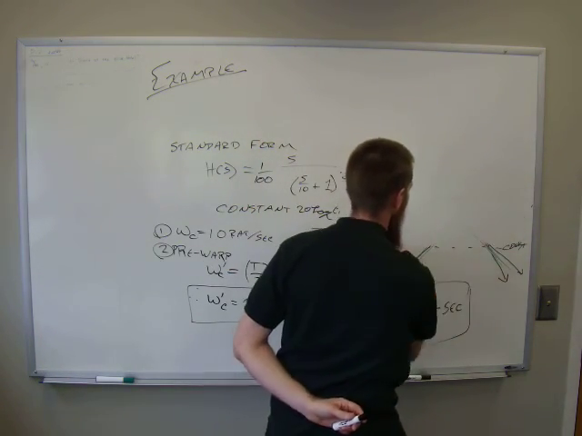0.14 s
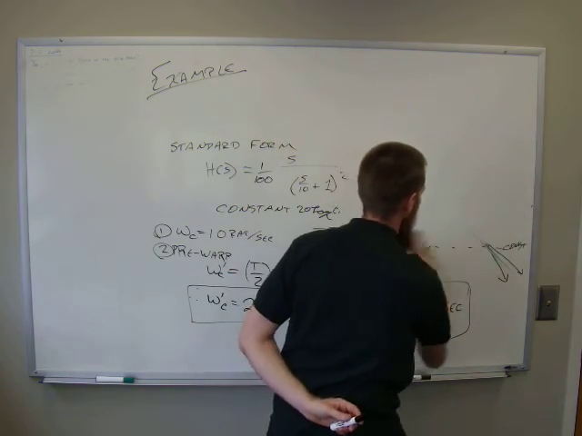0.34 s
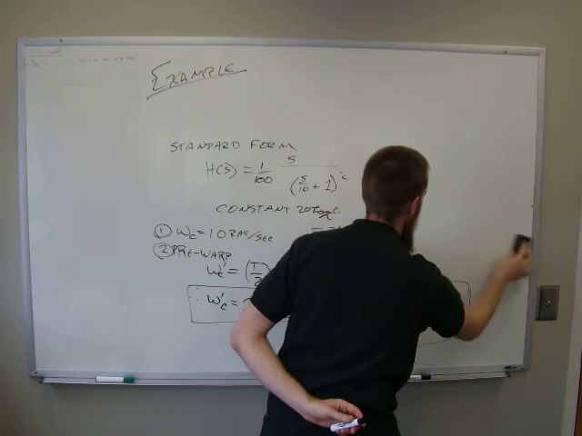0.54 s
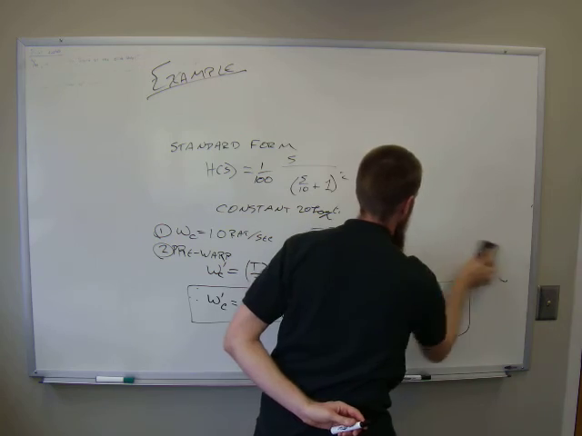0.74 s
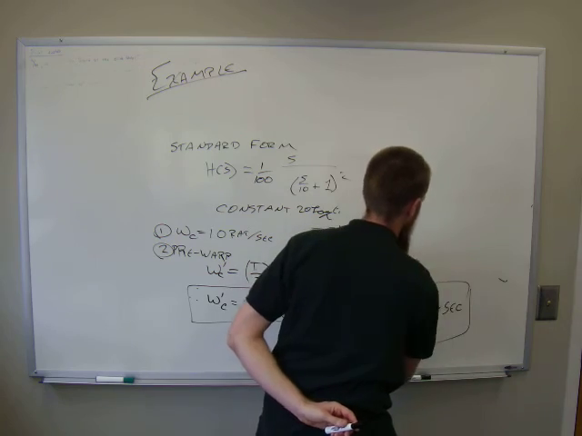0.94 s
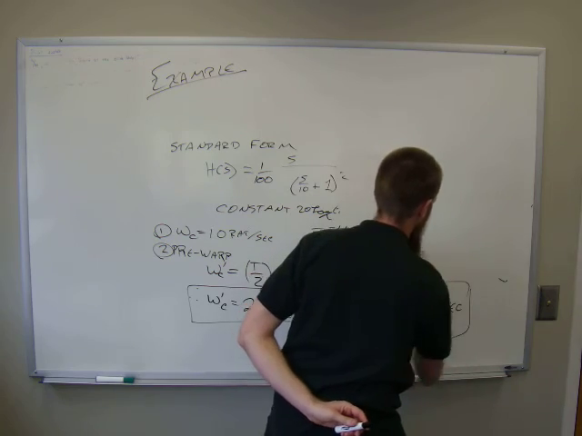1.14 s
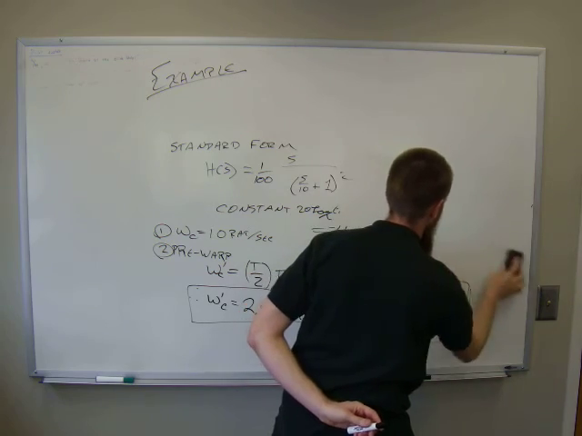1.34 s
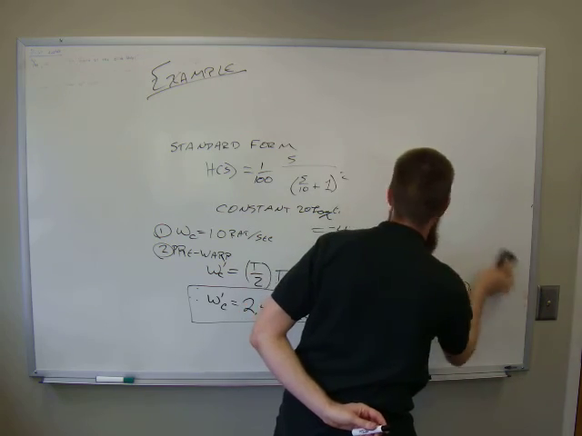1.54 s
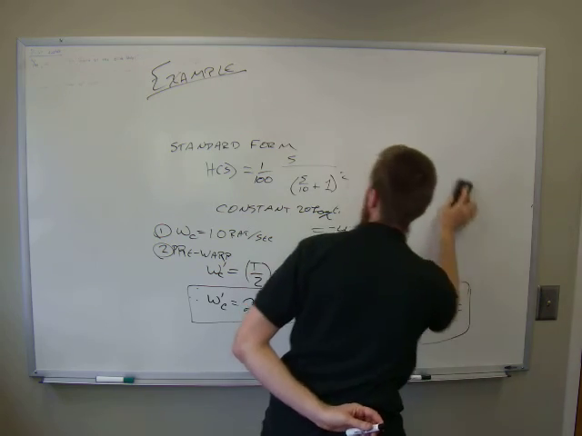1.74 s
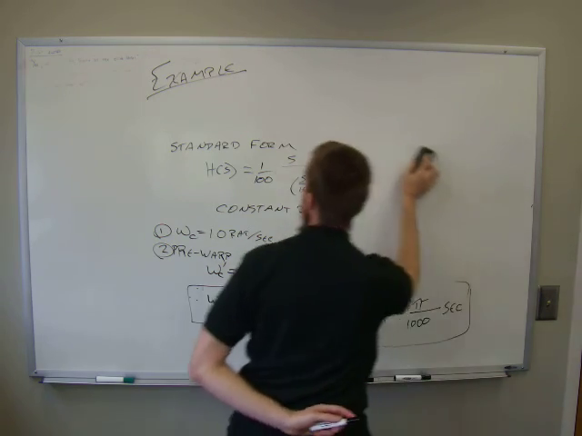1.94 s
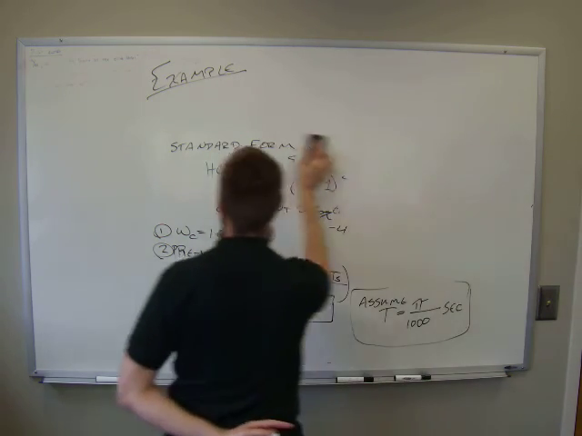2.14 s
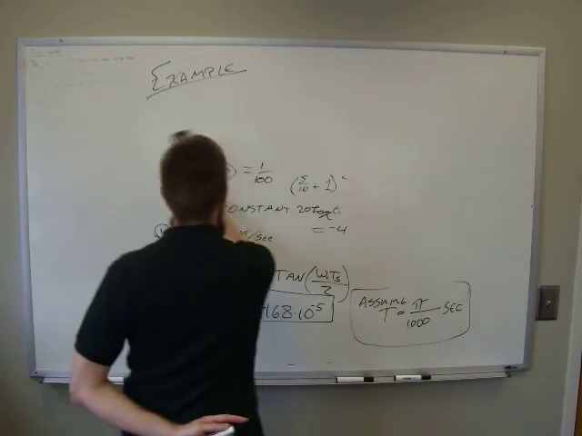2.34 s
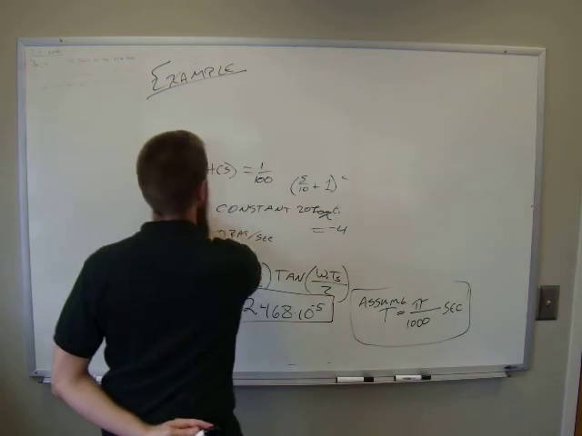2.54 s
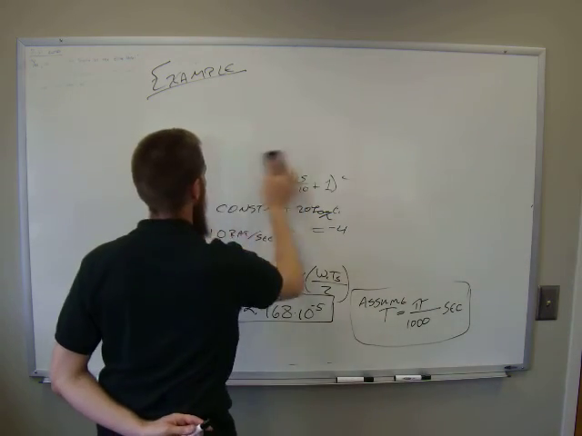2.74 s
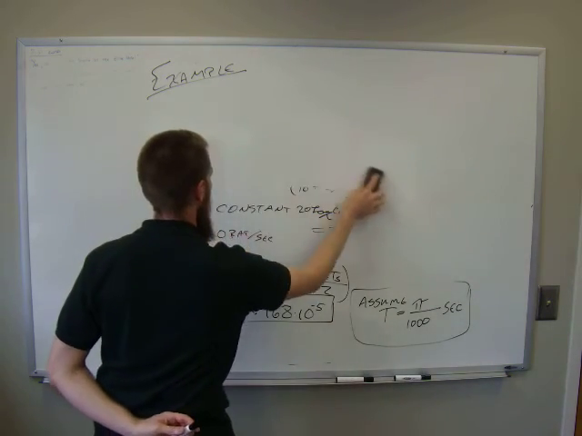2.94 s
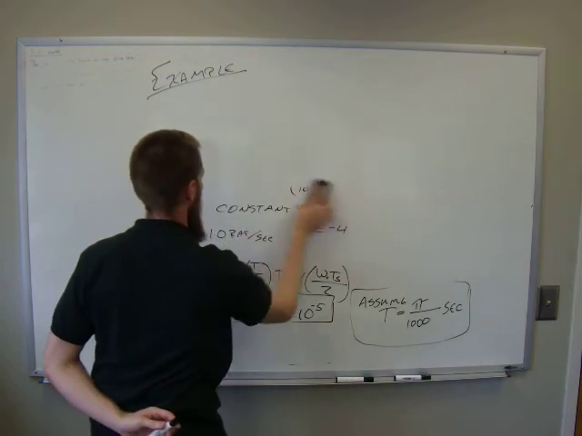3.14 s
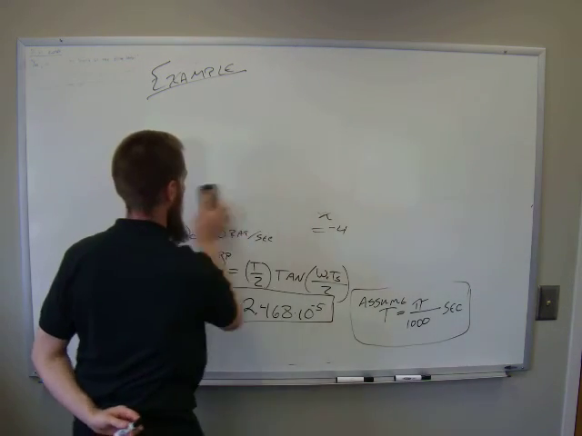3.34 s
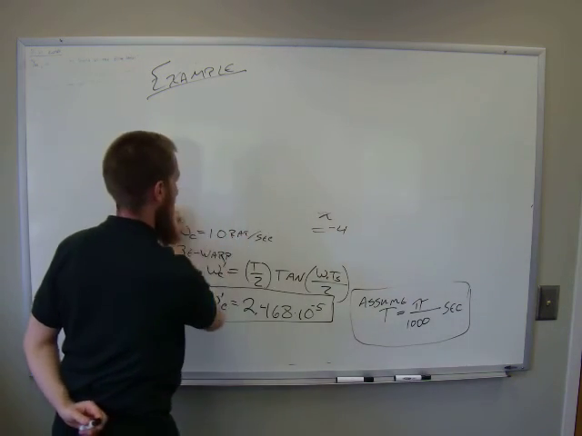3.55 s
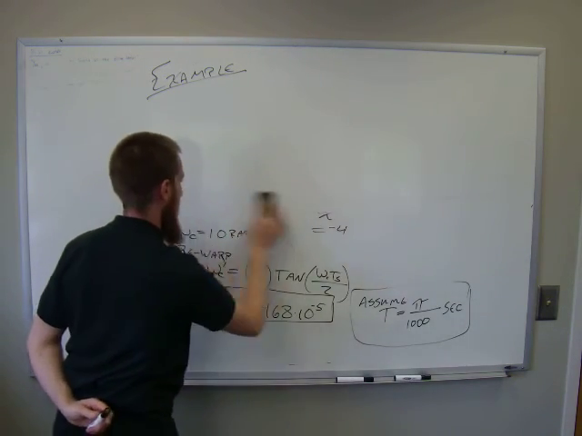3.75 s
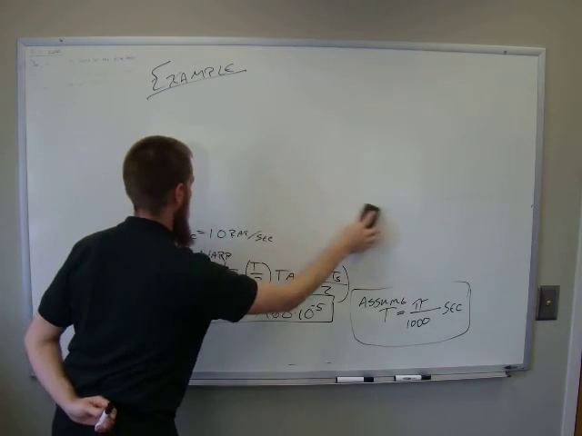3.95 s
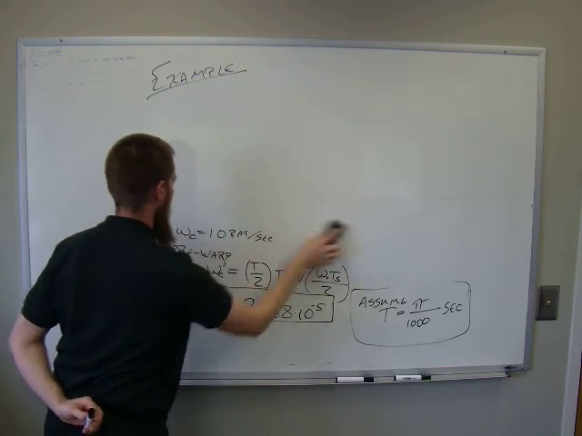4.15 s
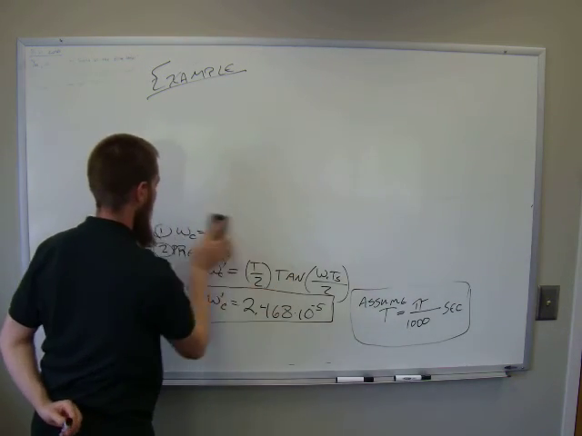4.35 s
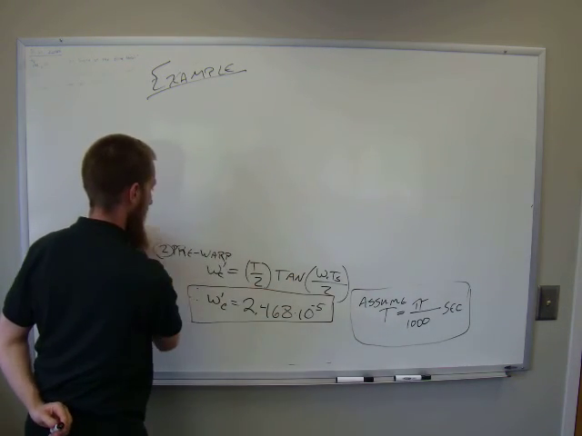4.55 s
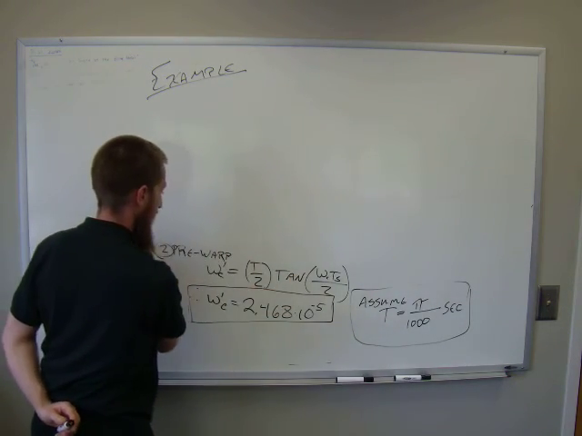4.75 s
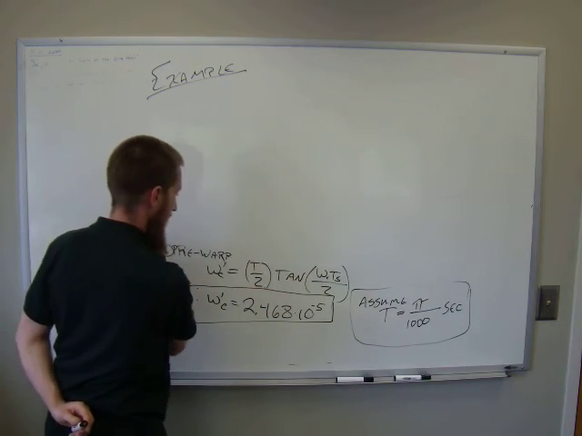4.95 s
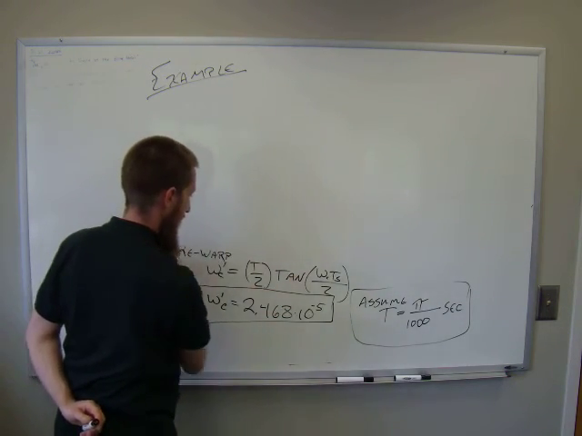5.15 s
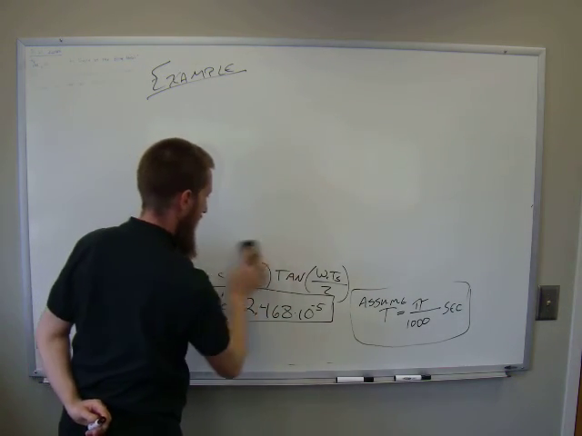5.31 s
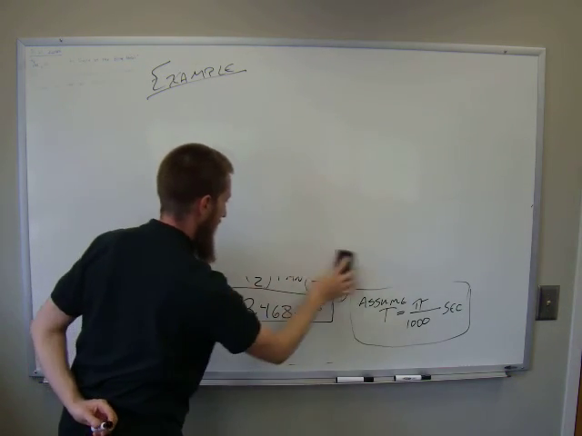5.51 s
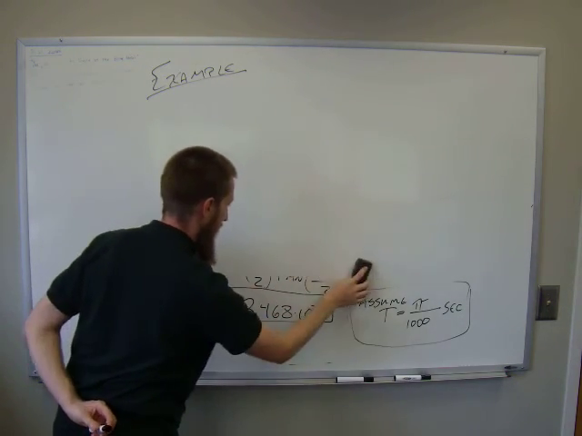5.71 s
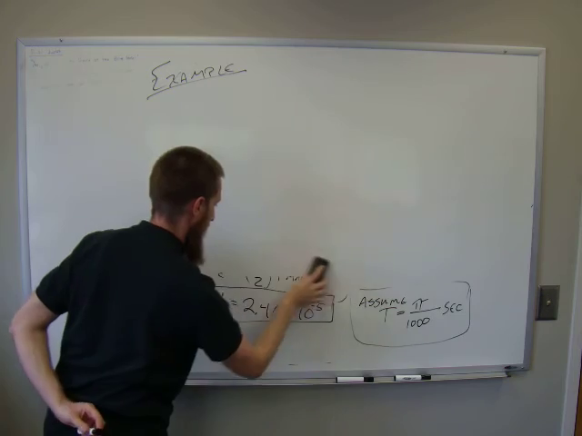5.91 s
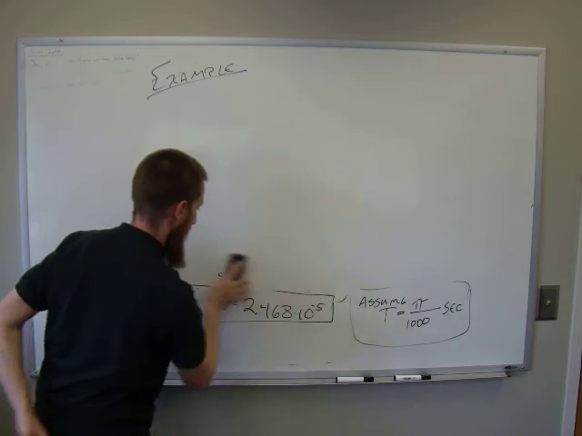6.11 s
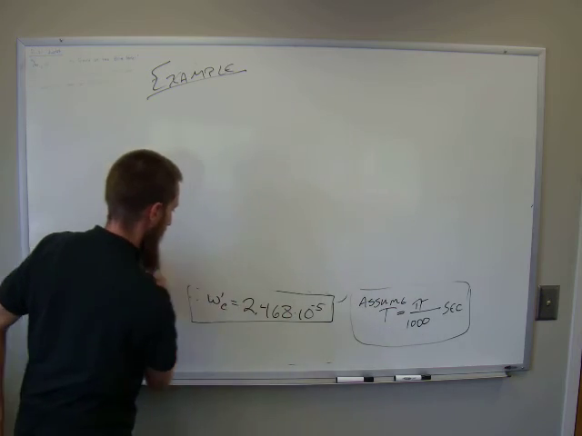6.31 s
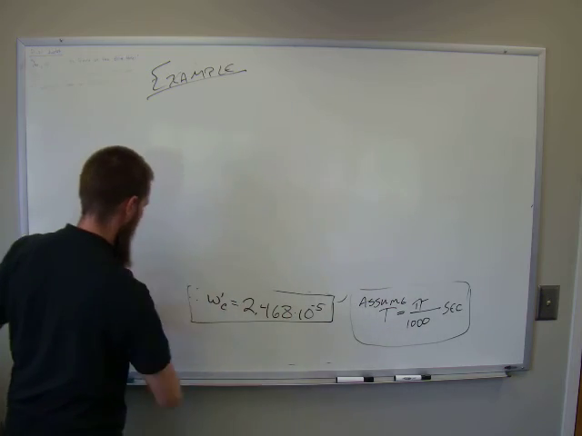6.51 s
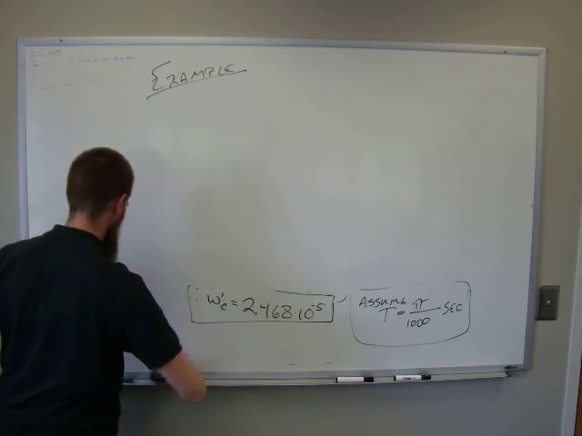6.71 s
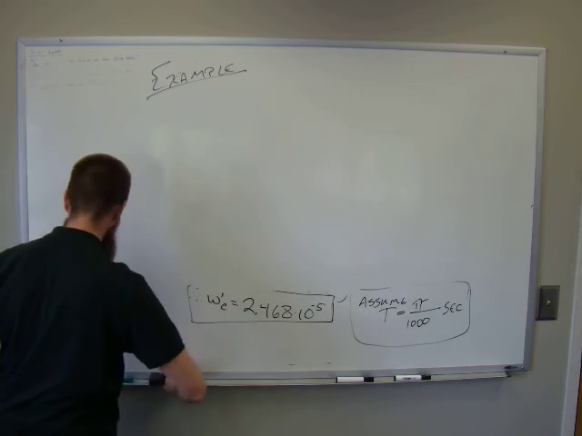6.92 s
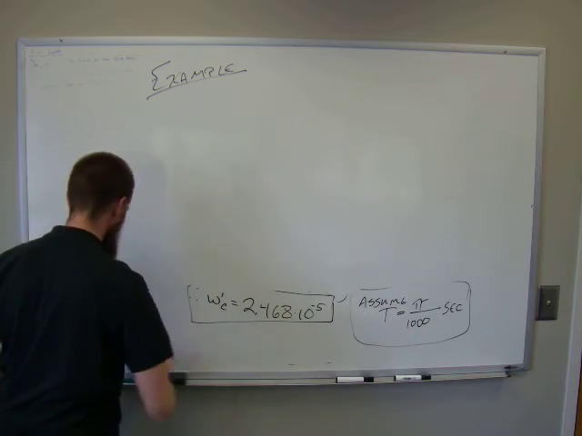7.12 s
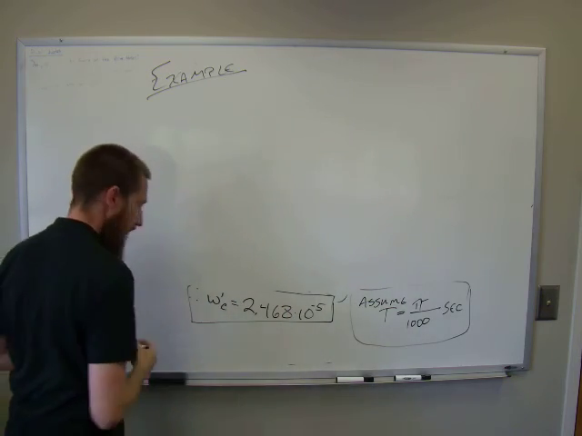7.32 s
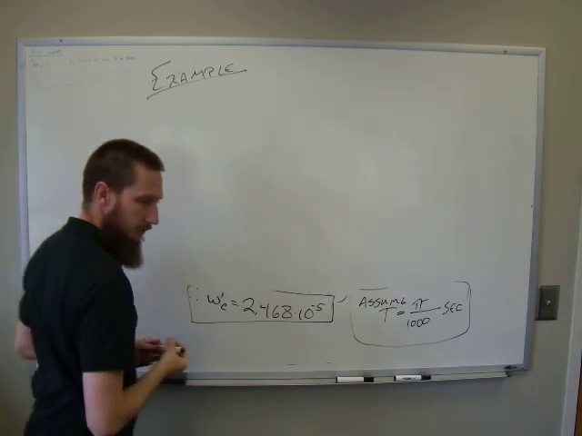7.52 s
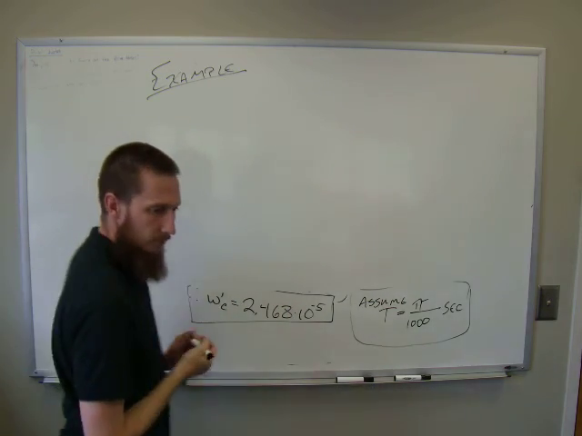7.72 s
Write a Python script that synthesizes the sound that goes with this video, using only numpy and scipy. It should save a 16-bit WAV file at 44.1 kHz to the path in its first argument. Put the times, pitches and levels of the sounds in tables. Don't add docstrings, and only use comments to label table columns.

```python
import sys
import numpy as np
from scipy import signal
from scipy.fft import rfft, irfft
from scipy.io import wavfile
from scipy.ndimage import uniform_filter1d

SR = 44100
rng = np.random.default_rng(int(sys.argv[2]) if len(sys.argv) > 2 else 0)


def attenuation_scalar(level_db):
    decades = np.asarray(level_db, float) / 20
    return 10 ** decades


def inscribe(sig):
    pcm = np.round(np.clip(np.atleast_2d(sig).T, -1, 1) * 32767)
    wavfile.write(sys.argv[1], SR, pcm.astype(np.int16))


N = 347067
FULL_SPEED_DB = -39


def level(x, db):
    return x * attenuation_scalar(db) / np.sqrt(np.mean(x ** 2))


def colour(x, points):
    hz, db = np.transpose(points)
    grid_hz = np.maximum(np.fft.rfftfreq(8192, 1 / SR), 1)
    log_gain = np.interp(np.log(grid_hz), np.log(hz), db) * np.log(10) / 20
    cepstrum = irfft(log_gain)
    cepstrum[1:4096] *= 2
    cepstrum[4097:] = 0
    impulse = irfft(np.exp(rfft(cepstrum)))
    return signal.fftconvolve(x, impulse)[:len(x)]


def walk(rate_hz):
    hold = int(SR / rate_hz)
    steps = np.repeat(rng.standard_normal(N // hold + 1), hold)
    return 1.3 * uniform_filter1d(uniform_filter1d(steps, hold), hold)[:N]


def eraser():
    # start/s, speed-up/s, slow-down/s, top-speed level/dB, pointedness (.4 flat, 2.5 peaked)
    strokes = [(-.052, 0.083, .14, -38, 0.55), (.11, 0.24, 0.28, -37, 2.34),
               (.466, 0.092, 0.075, -39.5, 1.4), (.592, .18, .19, -39.5, 0.34),
               (.955, 0.18, 0.33, -38.5, 0.77), (1.424, 0.13, 0.3, -41.5, 0.86),
               (1.699, 0.33, 0.15, -41.5, 0.61), (1.801, 0.47, 0.49, -36.6, 3.4),
               (2.399, 0.29, 0.32, -38.5, 0.88), (2.928, 0.31, 0.34, -39.5, 0.84),
               (3.495, 0.16, 0.31, -39.5, 0.41), (3.935, 0.38, 0.35, -40.5, 0.75),
               (4.5, .1, .075, -51, 0.51), (4.714, .51, 0.29, -41.5, 2.9), (5.24, 0.2, .15, -42.5, .55),
               (5.583, 0.62, 0.16, -40.8, 1.03)]
    # start/s, swell/s, fade/s, level/dB,
    # pointedness
    rustles = [
        (4.78, .03, 0.18, -56.5, .6),
        (6.36, .2, .06, -60, 0.48),
        (6.619, 0.088, .05, -55, .8),
        (6.87, 0.062, 0.076, -50, 0.84),
        (7.09, 0.057, 0.5, -55.5, 1.1),
        (7.425, 0.044, .04, -45.5, 1.3),
        (7.47, .06, 0.14, -57, .8),
        (7.59, 0.27, .15, -52.5, .4),
    ]
    # t/s, level/dB
    lean = [(0, -60.5), (.9, -60), (1.55, -55.5), (1.95, -55.5), (2.1, -50), (2.33, -44.5), (2.6, -50.5),
            (3, -55.5), (3.38, -57.5), (3.5, -50.5), (3.65, -54), (4.4, -55.5), (5.2, -56), (6.2, -58.5),
            (6.9, -53), (7.1, -53.5), (7.4, -56), (7.87, -54.5)]
    # f/Hz, gain/dB
    felt_tone = [(800, -44.5), (2000, -9), (3200, -1), (6000, 2), (8000, 2), (12000, -38)]
    # f/Hz, gain/dB
    fibre_tone = [(5000, -27), (7500, 2), (10500, 2), (13000, 1.5), (16000, -5.5)]
    # f/Hz, gain/dB
    board_tone = [(300, -37), (800, -11), (1250, 1), (1600, -2.5), (2300, -3), (3200, -7), (5000, -29.5)]
    hand, cloth = speed(strokes), speed(rustles)
    v = np.hypot(hand, cloth)
    press_db = np.interp(np.arange(N) / SR, *np.transpose(lean))
    grip_db = 0.15 * walk(18) + 0.75 * walk(60)

    felt = level(colour(slips(scatter_db=1.0), felt_tone), -0.45) * attenuation_scalar(0.21 * walk(25))
    fibres = level(colour(slips(scatter_db=0.0), fibre_tone), 12.4) * attenuation_scalar(-11 + 0.21 * walk(25.1))
    board = level(colour(slips(scatter_db=3.5), board_tone), 1.16) * attenuation_scalar(press_db + 1.6 * walk(18))

    dull = signal.lfilter(*signal.butter(2, 3280, fs=SR), felt)
    dull_speed = np.hypot(hand ** 0.52, cloth * attenuation_scalar(-2.5))
    surface = dull * dull_speed + (felt - dull) * v + fibres * v ** 1.57
    rub = surface * attenuation_scalar(FULL_SPEED_DB) + board * v ** 0.28
    return rub * attenuation_scalar(grip_db)


def speed(table):
    t, power = np.arange(N) / SR, np.full(N, 1e-9)
    for start_s, rise_s, fall_s, db, pointed in table:
        end_s = start_s + rise_s + fall_s
        ramp = np.clip(np.minimum((t - start_s) / rise_s, (end_s - t) / fall_s), 0, 1)
        power += (attenuation_scalar(db - FULL_SPEED_DB) * np.sin(np.pi / 2 * ramp) ** pointed) ** 2
    return np.sqrt(power)


def slips(scatter_db):
    jerk = np.minimum(rng.exponential(size=N), 5)
    return level(rng.standard_normal(N) * attenuation_scalar(scatter_db * jerk), 0)


def blows():
    # t/s, level/dB, centre f/Hz, spread/octaves, ring t60/s
    knocks = [(.3135, -32, 650, 0.34, 0.3), (.312, -35, 2500, .3, .05), (1.11, -39, 790, 0.56, 0.1),
              (1.415, -45, 1400, 0.52, .06), (1.585, -41, 1800, 1.1, 0.076), (2.079, -28.5, 3000, 1.6, .06),
              (2.159, -22.5, 4000, .88, 0.029), (2.294, -42.5, 1400, 0.96, .1),
              (4.28, -45, 1500, 1.34, .04), (4.79, -48, 3500, 1.3, .068), (5.639, -41, 2900, 0.57, 0.054),
              (5.638, -40.5, 1600, 0.51, 0.11), (7.803, -42, 3500, 1.2, 0.11)]
    # t/s, level/dB, centre f/Hz, spread/octaves, ring t60/s
    scuffs = [
        (.521, -21, 9400, 0.76, 0.14),
        (2.146, -26.5, 4000, .8, .1),
        (2.585, -31, 4660, 0.57, 0.21),
        (3.145, -31, 2500, 1.6, 0.16),
        (6.832, -25, 8400, 1, 0.1),
        (6.842, -23, 7750, .12, 0.079),
        (6.92, -57, 3000, 1.66, .3),
        (7.447, -34, 8500, 0.61, 0.21),
        (7.81, -42, 1450, .35, 0.18),
    ]
    # t/s, level/dB, centre f/Hz, spread/octaves, ring t60/s
    tray = [
        (6.703, -18, 5000, 1.6, 0.037),
        (6.706, -16.5, 4030, 0.49, 0.032),
        (6.712, -24.5, 3680, 1.8, 0.17),
        (6.708, -35.5, 460, 0.45, 0.47),
        (6.724, -22, 2470, 0.65, 0.098),
        (6.7645, -25.5, 4460, 1.9, .14),
        (6.7675, -27, 11500, 0.25, 0.0079),
    ]
    hits = contacts(knocks, rise_s=0.0023) + contacts(scuffs, rise_s=0.011) + contacts(tray, rise_s=0.00035)
    return hits + thuds()


def contacts(table, rise_s):
    out, t = np.zeros(N + SR), np.arange(SR // 2) / SR
    hz = np.maximum(np.fft.rfftfreq(len(t), 1 / SR), 1)
    noises = rng.standard_normal((len(table), len(t)))
    for (start_s, db, centre_hz, spread_oct, t60_s), noise in zip(table, noises):
        band = np.exp(-0.5 * (np.log2(hz / centre_hz) / spread_oct) ** 2)
        ring = level(irfft(rfft(noise) * band, len(t)), db)
        envelope = (1 - np.exp(-t / rise_s)) * attenuation_scalar(-60 * t / t60_s)
        out[int(start_s * SR):][:len(t)] += ring * envelope
    return out[:N]


def thuds():
    # t/s, level/dB, brightness/(dB/octave), damping (1 = free), time until felt stills it/s
    impacts = [
        (0.3122, -37, 1.5, 1.18, 0.1),
        (1.109, -44, -2.5, 1.8, 0.22),
        (6.704, -37.5, 6.5, 3.8, .3),
        (6.723, -51, 15, 1.22, 0.34),
        (6.925, -55, -4, 0.55, 0.079),
        (7.808, -60.5, 5, 1.3, .1),
    ]
    # f/Hz, level/dB, t60/s
    panel = [(351, -11, 0.34), (395.6, -8, 0.35), (455, -9, 0.45), (490, 11, 0.13), (541, -2.5, 0.33),
             (602.5, 0.5, 0.071), (614, -3.5, 0.71), (655, -13, 0.6), (703, -5, 0.093), (726, -10, 0.17),
             (805, -1.5, 0.22), (1126, 0.5, 0.15), (1271, -1, 0.26), (1337, 2.5, 0.12), (1390, -0.5, 0.23),
             (1495, 2, 0.11), (1600, -15, 0.15), (1836, -5.5, 0.15), (1770, 3, 0.14), (1930, -12, 0.31),
             (2540, -58, 0.079)]
    out, t = np.zeros(N + SR), np.arange(SR // 2) / SR
    hz, mode_db, t60_s = np.transpose(panel)[:, :, None]
    spots = rng.standard_normal((len(impacts), 2, len(panel), 1))
    for (start_s, db, bright_db, damp, free_s), (share, phase) in zip(impacts, spots):
        start_db = db + mode_db + bright_db * np.log2(hz / 600) + 2.6 * share
        gain = attenuation_scalar(start_db - 60 * damp * t / t60_s)
        modes = np.sum(gain * np.sin(2 * np.pi * hz * t + 0.67 * phase), axis=0)
        push = (1 - np.exp(-t / 0.00094)) * np.exp(-np.maximum(t - free_s, 0) / 0.0094)
        out[int(start_s * SR):][:len(t)] += push * modes
    return out[:N]


def room(x, wet_db):
    t = np.arange(SR // 2) / SR
    tail = rng.standard_normal(len(t)) * attenuation_scalar(-60 * t / 0.36) * (t > 0.006)
    tail *= attenuation_scalar(wet_db) / np.sqrt(np.sum(tail ** 2))
    return x + signal.fftconvolve(x, tail)[:N]


def ventilation():
    # f/Hz, gain/dB
    air = [(15, -10), (35, -4), (52, -1.5), (68, 6.5), (88, -1.5), (150, -0.5), (300, -4.5), (600, -2.5),
           (1300, -7.5), (2500, -17.5), (5000, -20), (9000, -24), (16000, -51)]
    return level(colour(rng.standard_normal(N), air) * attenuation_scalar(0.12 * walk(3.45)), -52.5)


def scene():
    mono = room(eraser(), wet_db=-14) + room(blows(), wet_db=-9.5) + ventilation()
    return np.array([mono, mono])


def top_cut(x):
    return signal.sosfilt(signal.butter(12, 15870, fs=SR, output="sos"), x)


def record(dry):
    # f/Hz, gain/dB
    housing = [(200, 0.5), (540, 3.5), (760, 1), (1000, -6.5), (1350, 4.5), (1800, -2.5), (2300, -1.5),
               (3500, 0.5), (4600, 5), (5600, -2), (7000, -9), (8800, -11), (11000, -9), (15000, -22.5)]
    # f/Hz, gain/dB
    grille = [(4000, 0.5), (4400, 1.5), (5150, 3.5), (5650, -1.5), (6000, 3), (6450, 0), (7200, 4),
              (7900, 1), (8500, 1), (9200, 2), (14500, 0.5), (15700, -3)]
    notch_hz = (7418, 14836)
    # f/Hz, rms level/dB
    whine = [(14777, -84), (14896, -87)]
    hiss = level(rng.standard_normal(N), -58)
    x = colour(colour(dry[0], housing) + hiss, grille)
    for hz in notch_hz:
        x = signal.lfilter(*signal.iirnotch(hz, 140, SR), x)
    t = np.arange(N) / SR
    for hz, rms_db in whine:
        x = x + attenuation_scalar(rms_db + 3) * np.sin(2 * np.pi * hz * t)
    band_limit = signal.ellip(12, 0.3, 70, 15740, fs=SR, output="sos")
    x = signal.sosfilt(band_limit, x)
    return top_cut(np.array([x, x]))


dry = scene()
out = record(dry)
inscribe(out)
```